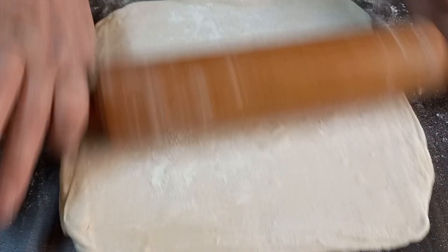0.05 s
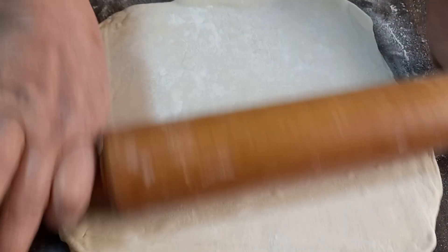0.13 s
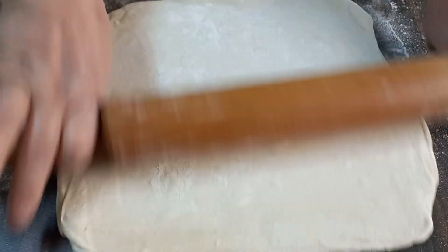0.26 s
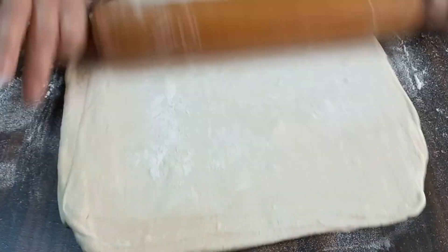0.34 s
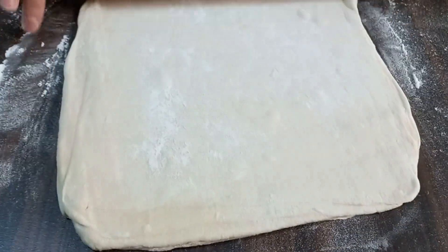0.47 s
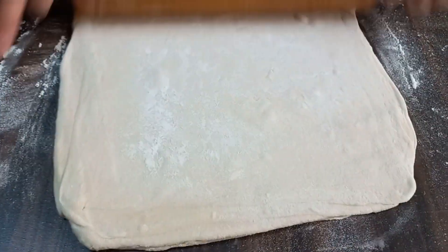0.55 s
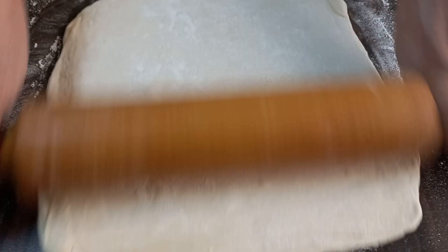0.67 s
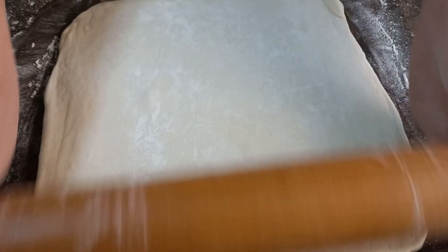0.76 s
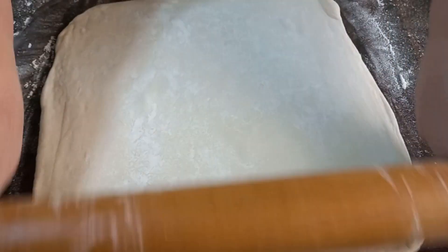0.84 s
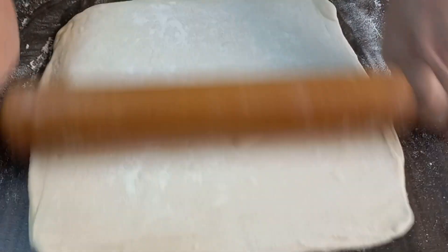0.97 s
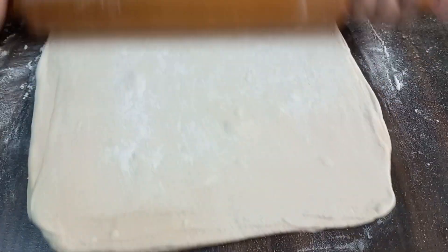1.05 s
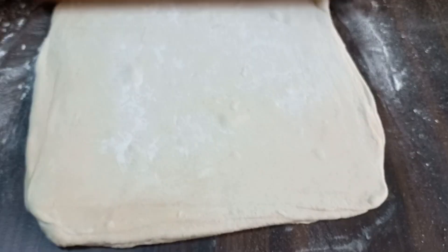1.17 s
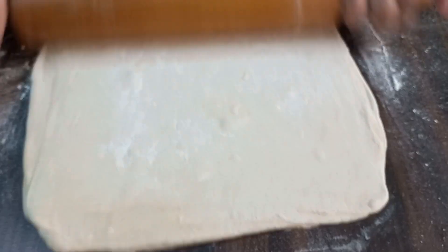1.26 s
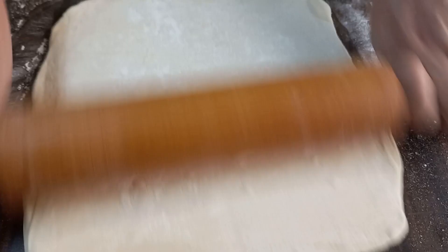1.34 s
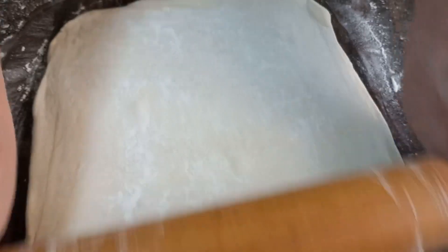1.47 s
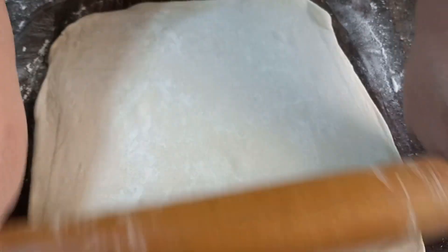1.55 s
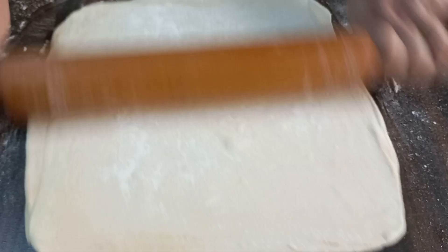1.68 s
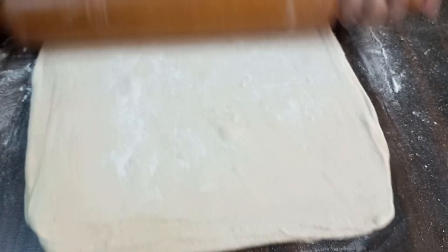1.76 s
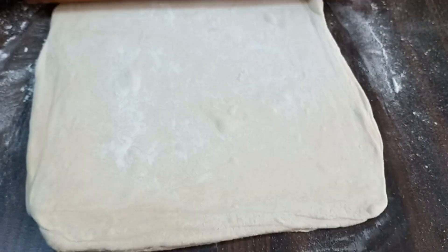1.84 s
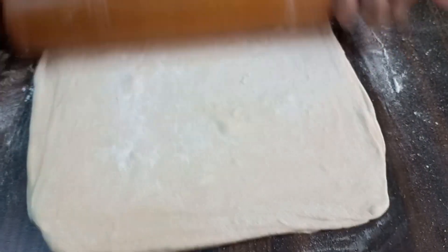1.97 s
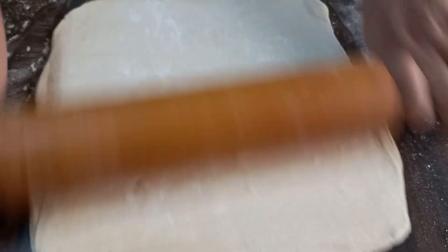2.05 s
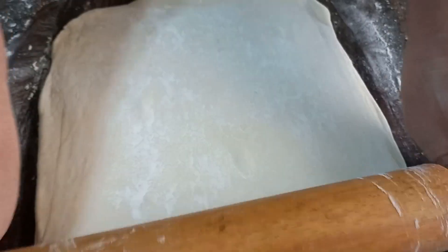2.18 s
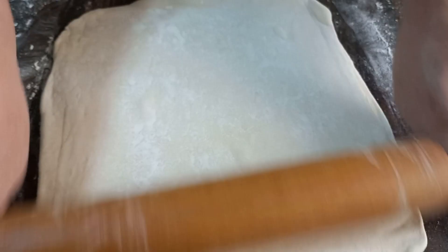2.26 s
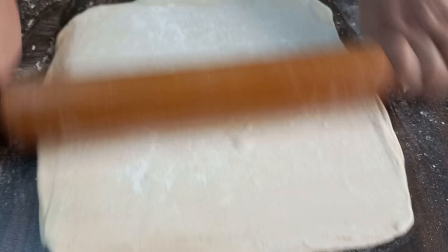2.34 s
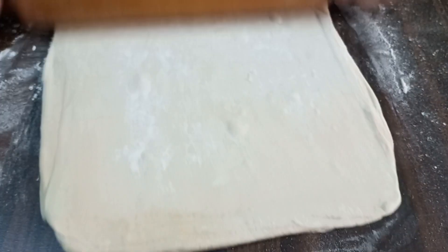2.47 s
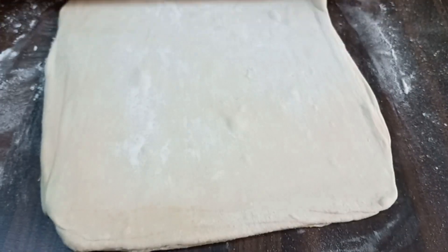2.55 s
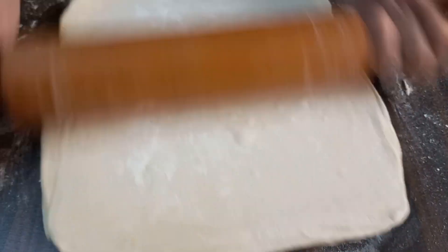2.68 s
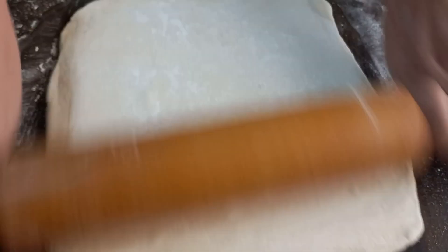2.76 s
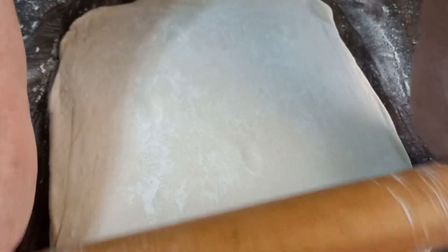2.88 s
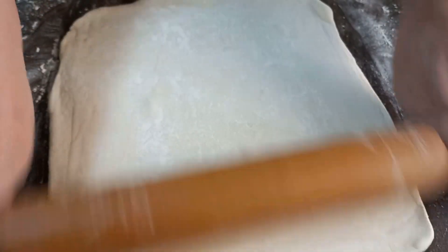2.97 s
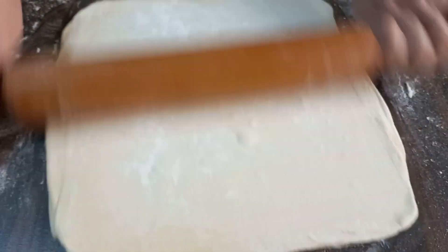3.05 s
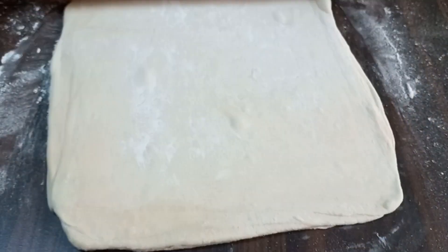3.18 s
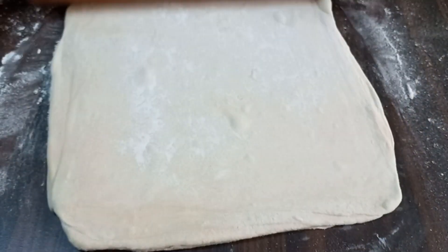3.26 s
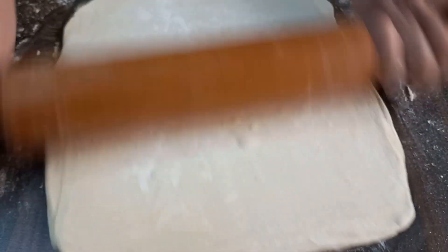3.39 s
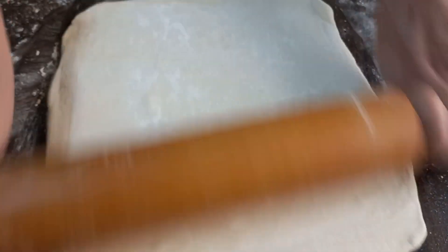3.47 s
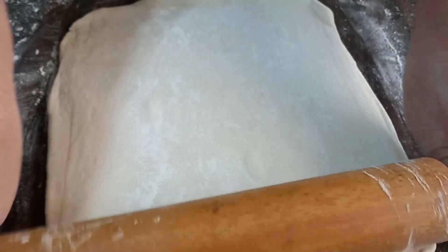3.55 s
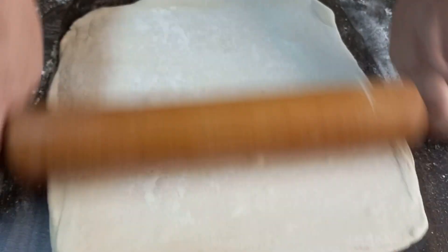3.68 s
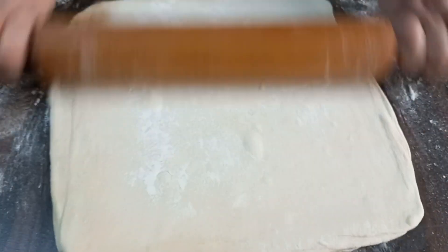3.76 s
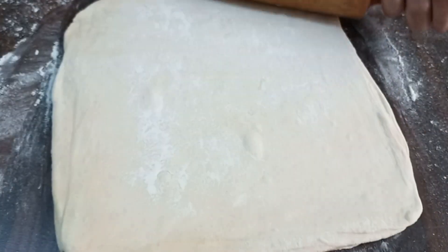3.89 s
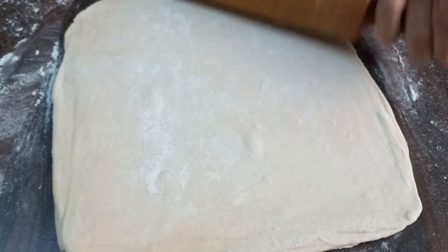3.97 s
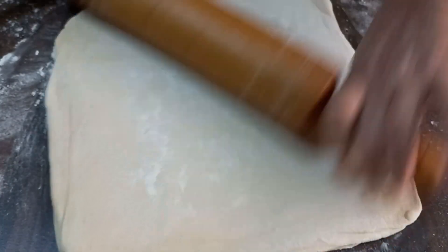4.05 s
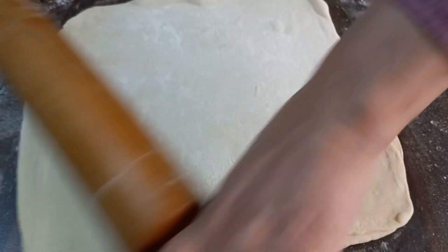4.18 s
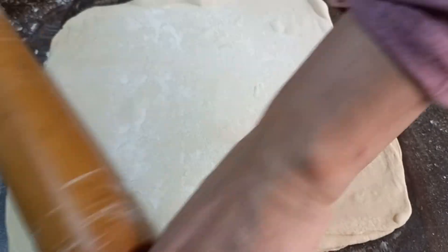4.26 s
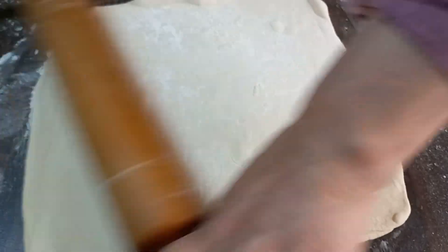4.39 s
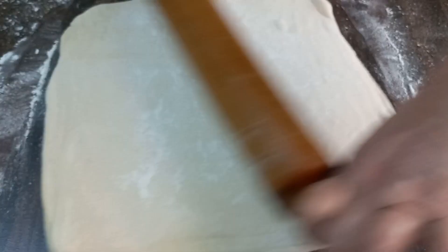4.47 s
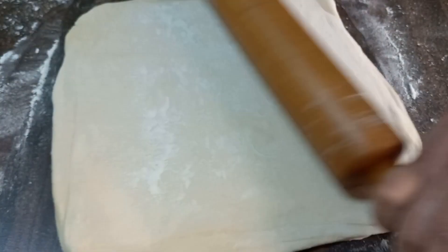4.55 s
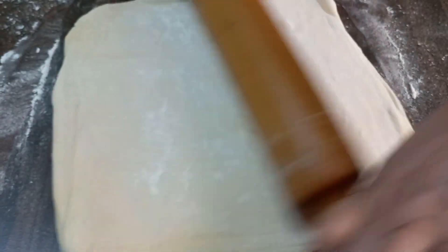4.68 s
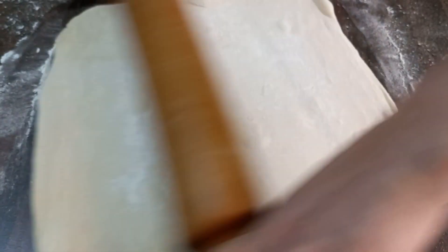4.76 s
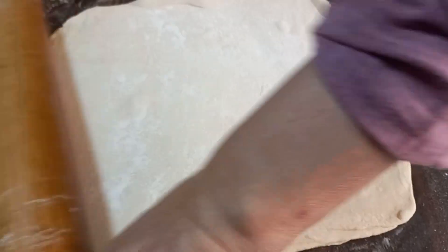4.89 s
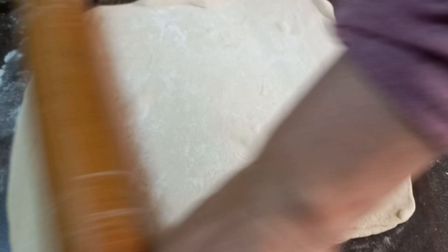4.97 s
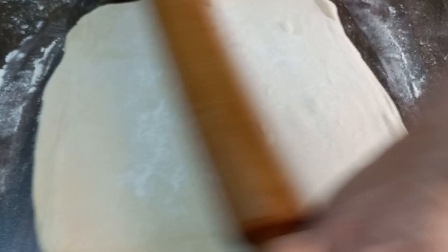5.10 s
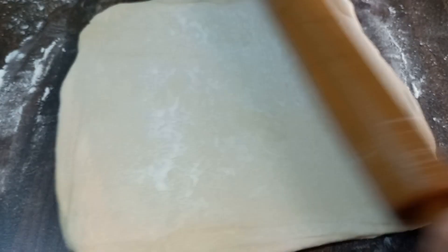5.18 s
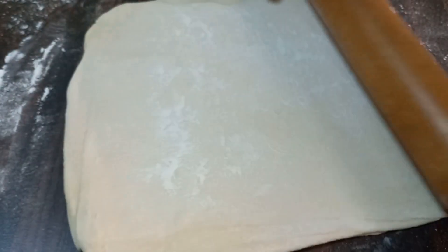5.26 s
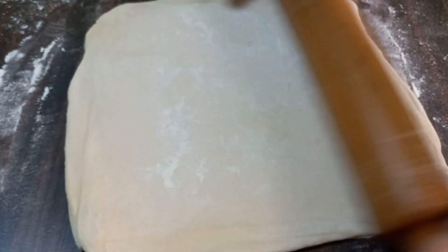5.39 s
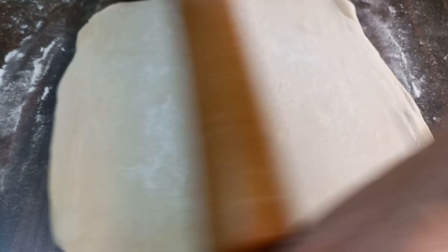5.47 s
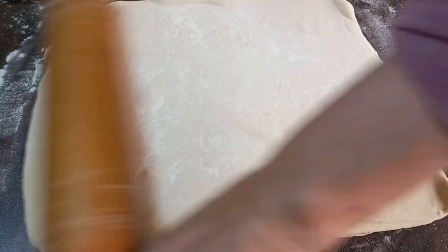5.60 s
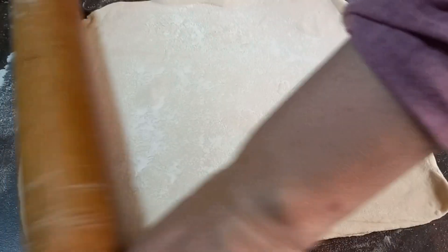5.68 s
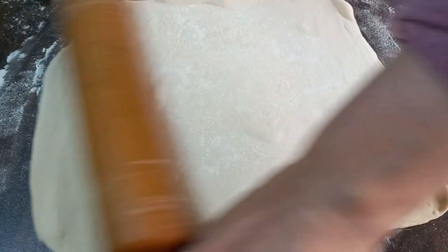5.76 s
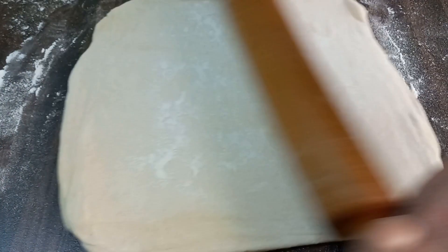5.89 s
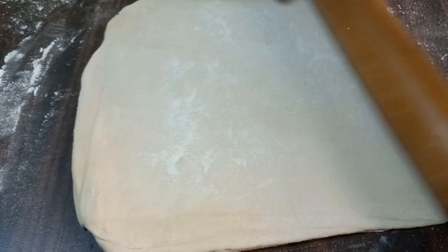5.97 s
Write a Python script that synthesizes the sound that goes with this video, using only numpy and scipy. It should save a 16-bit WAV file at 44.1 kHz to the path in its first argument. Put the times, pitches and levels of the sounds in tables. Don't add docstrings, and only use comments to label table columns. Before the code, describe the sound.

A wooden rolling pin rubs to and fro over floured dough, counter booming softly under the weight, with dull bumps and one hard knock.

```python
import sys
import numpy as np
from scipy import signal
from scipy.fft import rfft, irfft, next_fast_len
from scipy.io import wavfile
from scipy.ndimage import uniform_filter1d

SR = 44100
rng = np.random.default_rng(int(sys.argv[2]) if len(sys.argv) > 2 else 0)


def volts_from_decibels(level):
    exponent = np.asarray(level, float) / 20
    return 10 ** exponent


def generate_wav(signal):
    frames = np.transpose(np.atleast_2d(signal))
    scaled = np.clip(frames, -1, 1) * 32767
    pcm = np.round(scaled).astype(np.int16)
    wavfile.write(sys.argv[1], SR, pcm)


N = 265923
T = np.arange(N) / SR


def evened(x):
    return x / np.sqrt(np.mean(x ** 2) + 1e-20)


def read(points, hz):
    f, value = np.transpose(points)
    return np.interp(np.log(hz + 1), np.log(f + 1), value)


def curves(rows):
    s, *columns = np.transpose(rows)
    return [np.interp(T, s, c) for c in columns]


def add(mix, s, sound):
    part = mix[round(s * SR):][:len(sound)]
    part += sound[:len(part)]


def ring(x, hz, width):
    r = np.exp(-np.pi * width / SR)
    turn = 2 * np.pi * hz / SR
    return signal.lfilter([np.sin(turn)], [1, -2 * r * np.cos(turn), r * r], x)


# pitch_hz, likeness (1 = same, 0 = unrelated)
LIKENESS = [(60, 0.19), (130, 1), (290, 0.64), (640, 0.47), (1410, 0.1), (3100, 0.046), (6820, -0.036),
            (15000, -0.048)]


def noise(colour, patchy_db, flicker_db, size=512):
    frames = 4 * N // size + 5
    hz = np.fft.rfftfreq(size, 1 / SR)
    a, b, c, d, patches = rng.standard_normal((frames, len(hz), 5)).T
    patches = uniform_filter1d(patches, size=3, axis=0)
    patches = evened(uniform_filter1d(patches, size=20, axis=1))
    flicker = evened(uniform_filter1d(rng.standard_normal(frames), size=4))
    same = np.clip(read(LIKENESS, hz), -1, 1)[:, None]
    left = a + 1j * b
    right = same * left + np.sqrt(1 - same ** 2) * (c + 1j * d)
    z = np.array([left, right])
    z *= volts_from_decibels(read(colour, hz)[:, None] + patchy_db * patches + flicker_db * flicker)
    return evened(signal.istft(z, nperseg=size, noverlap=3 * size // 4)[1][:, :N])


# dough_scuff_db, fine_fizz_db, palm_grip_db
STROKES = [(-.26, -51, -2, -1, -13), (0.083, -52.5, -2, 3, -10.5), (0.393, -52.5, -2.5, 2.5, -13),
           (0.738, -51, -3.5, 4.5, -11), (1.058, -54, -1, 3.5, -8.5), (1.426, -51, -3, 4.5, -9),
           (1.769, -54, -1.5, 1, -14), (2.114, -52, -2.5, 4.5, -12), (2.442, -54, -1, 4, -11.5),
           (2.791, -51.5, -2.5, 3.5, -13), (3.140, -52, -2.5, 4, -10), (3.481, -51, -4, 2.5, -12),
           (3.808, -56, -5, 2.5, -5), (4.206, -56.5, -4, 3, -7), (4.519, -57.5, -3, 2.5, -3),
           (4.833, -56.5, -1.5, 2.5, -7), (5.208, -56.5, -4.5, 4, -5), (5.577, -55.5, -0.5, 2, -6.5)]
LAST_TURN_S = 6.025


def stroke_at(lag_s=0):
    turns = np.append(np.transpose(STROKES)[0], [LAST_TURN_S, LAST_TURN_S + .35]) + lag_s
    k = np.searchsorted(turns, T, side="right") - 1
    length = np.diff(turns)[k]
    return np.minimum(k, len(STROKES) - 1), (T - turns[k]) / length, length


def blurred(level_db):
    blur_s = 0.0099
    return uniform_filter1d(level_db, max(round(blur_s * SR), 1))


# full_speed_shift (share of stroke), let_go_shift (share of stroke),
# extra_sag_db, stopped_before (how fully the pin had stopped, 0-1)
PACE = [(0, 0.033, 0, 1), (-0.034, -0.052, -1, 1), (.1, 0.02, 1, 0.82), (0.011, -0.026, 1, 1),
        (-0.047, 0.023, 1, 0.93), (-0.027, -0.066, -0.5, 0.99), (-0.062, 0.053, -0.5, 1),
        (-0.02, 0.0084, -0.5, 1.05), (-0.028, 0.034, -0.5, 1), (-0.057, -0.078, 0, 1.05),
        (0.035, 0.022, -2.5, 0.75), (-0.051, 0.041, 0, 1.06), (-0.071, 0.018, -3.5, 0.57),
        (0.0026, -0.019, 0, 0.68), (0.0037, -.05, 1, 0.77), (-0.13, 0.00088, 3, 0.81),
        (-0.019, -0.04, 0.5, 0.88), (-0.047, -0.02, 0.5, 0.9), (0, 0, 0, 0.8)]


def sliding(level_db, shape):
    turn_db, swell, lag_s, ways = shape
    k, u, _ = stroke_at(lag_s)
    full, let_go, sag_db = (np.array(ways)[k % 2] + np.array(PACE)[k, :3]).T
    full = np.clip(full, .1, .9)
    let_go = np.clip(let_go, full + .01, .97)
    stopped = np.transpose(PACE)[3]
    rise = turn_db * stopped[k] * np.clip(1 - u / full, 0, 1) ** swell
    sag = sag_db * np.clip((u - full) / (let_go - full), 0, 1)
    drop = (turn_db * stopped[k + 1] - sag_db) * np.clip((u - let_go) / (1 - let_go), 0, 1)
    return volts_from_decibels(blurred(level_db[k] + rise + sag + drop))


# pitch_hz, level_db (per Hz)
HISS = [(3300, -32), (3900, -10.5), (4440, 1), (5500, -1), (6790, -3), (7520, -2.5), (8290, -7.5),
        (10500, -4), (13600, -72)]
SCUFF = [(410, -12), (700, -9.5), (960, -8), (1250, -2), (1500, -0.5), (1910, -2), (2250, -3.5),
         (2700, -11.5), (3200, -10), (3800, -7.5), (4400, -22.5)]
FIZZ = [(8500, -15), (10300, -6), (11500, 1), (12500, 3.5), (14000, 2.5), (15700, 0.5), (17000, -20)]
GRIP = [(2100, -43), (2450, -3), (2620, -5.5), (2800, -11.5), (3100, -20)]
# full_at (share of stroke), let_go_at (share of stroke), sag_db
HISS_SHAPE = (-22.5, 2.21, 0.00068, [(0.47, .8, -2), (0.5, 0.82, -3)])
SCUFF_SHAPE = (-23, 1.93, 0.022, [(.55, .7, -2.7), (.55, .7, -2.7)])
FIZZ_SHAPE = (-25, 2.1, 0.002, [(.38, .78, -2.5), (.45, .84, -3.5)])
GRIP_SHAPE = (-24, 1.9, 0.0092, [(.55, .84, -0.43), (.55, .84, -1.8)])
# time_s, extra_fizz_db
SURGES = [(.54, 0.77), (1.2, 2.4), (1.9, 6.2), (2.57, 3), (3.28, 4.5), (5.3, 1)]


def rolling():
    _, hiss_db, scuff_db, fizz_db, grip_db = np.transpose(STROKES)
    surge_width_s = 0.018
    surge_db = sum(db * np.exp(-((T - s) / surge_width_s) ** 2) for s, db in SURGES)
    hiss = sliding(hiss_db, HISS_SHAPE) * noise(HISS, patchy_db=2.83, flicker_db=0.24)
    scuff = sliding(hiss_db + scuff_db, SCUFF_SHAPE) * noise(SCUFF, patchy_db=-1.0, flicker_db=0.2)
    fizz = sliding(hiss_db + fizz_db, FIZZ_SHAPE) * noise(FIZZ, patchy_db=3.0, flicker_db=1.0)
    grip = sliding(hiss_db + grip_db, GRIP_SHAPE) * noise(GRIP, patchy_db=-0.5, flicker_db=1.1)
    return hiss + scuff + volts_from_decibels(surge_db) * fizz + grip


# heaviest_at (share of stroke), held_for (share of stroke),
# slab_boom_db, wood_rumble_db, boom_fall (dB per s)
WEIGHT = [(0.64, .1, -30, -43.5, 194), (0.59, 0.33, -42.5, -53.5, 190), (0.65, 0.13, -39.5, -48, 146),
          (0.6, 0.089, -35, -49.5, 115), (.6, 0.13, -39, -46, 64), (0.63, 0.29, -33.5, -55.5, 216),
          (0.62, 0.41, -42, -55, 190), (0.66, 0.19, -36.5, -52, 90), (0.61, 0.2, -40.5, -51.5, 300),
          (0.62, 0.11, -37.5, -50, 74), (0.59, 0.18, -43.5, -52, 170), (0.6, 0.24, -48, -58, 187),
          (0.47, .3, -41.5, -58.5, 447), (0.75, 0.68, -52, -69, 100), (0.71, 0.17, -45, -61, 150),
          (0.64, 0.32, -50, -57.5, 196), (.6, 0.33, -49, -64, 248), (.5, .35, -47, -59, 190)]


def leaning():
    boom_rise, wood_rise, wood_fall = 137, 86.5, 87
    k, u, length = stroke_at()
    at, held, boom_db, wood_db, boom_fall = np.array(WEIGHT)[k].T
    early_s = np.maximum(at - u - held / 2, 0) * length
    late_s = np.maximum(u - at - held / 2, 0) * length
    boom_db = boom_db - boom_rise * early_s - boom_fall * late_s
    wood_db = wood_db - wood_rise * early_s - wood_fall * late_s
    return blurred(boom_db), blurred(wood_db)


# pitch_hz, level_db (per Hz)
WOOD = [(120, -2.5), (200, 6), (250, -2.5), (300, 0.5), (345, -14), (410, -22), (540, -10.5), (670, -18.5),
        (800, -15), (1000, -19), (1300, -55.5)]
# pitch_hz, width_hz, level_db
SLAB_MODES = [(94.7, 5.7, 0.5), (121.74, 4.85, 5.5), (188, 11.6, -12), (291.5, 3.6, -28)]


def counter():
    jolts_per_s = 400.0
    steadied = 0.73
    boom_db, wood_db = leaning()
    wood = volts_from_decibels(wood_db) * noise(WOOD, patchy_db=1.5, flicker_db=1.2, size=1024)
    jolts = rng.standard_normal((3, N)) * (rng.random(N) < jolts_per_s / SR)
    common, left, right = (
        sum(volts_from_decibels(db) * evened(ring(j, hz, width)) for hz, width, db in SLAB_MODES) for j in jolts)
    power = uniform_filter1d(uniform_filter1d(common ** 2, size=2500), size=2500)
    swells = abs(power) ** (steadied / 2)
    slab = common + 0.056 * np.array([left, right])
    return wood + volts_from_decibels(boom_db) * evened(slab / swells)


# time_s, firing_rate_hz, level_db, low_boom_db
ENGINE = [(0, 47.92, -48, -82), (.62, 47, -50.5, -81), (.85, 46, -49.5, -59), (.95, 43, -54, -84),
          (1.35, 40.87, -44, -78), (1.6, 36, -60, -70), (1.9, 30.5, -51.5, -80), (2.1, 30.49, -57.5, -54),
          (3.0, 30.8, -56.5, -50), (3.4, 30.4, -49.5, -50), (3.55, 30.43, -73, -70), (3.7, 31.45, -54, -55),
          (4.4, 33.2, -57.5, -59), (4.54, 33.23, -61, -90), (4.63, 32.42, -46, -52),
          (5.15, 32.48, -51.5, -57), (5.6, 31.4, -52.5, -52.5), (6.03, 31.2, -54.5, -55)]
# pitch_hz, level_db
WALLS = [(40, -41), (95, -27), (128, -7), (140, 1), (165, -0.5), (195, -5.5), (230, -11.5), (255, -17),
         (290, -20), (400, -35.5)]


def engine():
    hz, level_db, boom_db = curves(ENGINE)
    turns = np.cumsum(hz) / SR
    out = np.zeros((2, N))
    for order in range(1, 11):
        waver = evened(np.interp(T, np.arange(62) / 10, rng.standard_normal(62)))
        side_shift = [[0], [0.35 * rng.standard_normal()]]
        phase = 2 * np.pi * (order * turns + rng.random()) + 0.29 * waver + side_shift
        db = boom_db if order == 2 else level_db + read(WALLS, order * hz)
        out += np.sqrt(2) * volts_from_decibels(db + 1.5 * waver[::-1]) * np.sin(phase)
    return out


# pitch_hz, level_db (per Hz)
AIR = [(25, -8), (70, 1), (140, 13.5), (216, 0.5), (423, -12.5), (949, -35), (1860, -17), (2570, -33.5),
       (3200, -69), (4650, -36.5), (8400, -30.5), (12600, -43.5), (15700, -65)]


def still_air():
    return volts_from_decibels(-57) * noise(AIR, patchy_db=2.2, flicker_db=.3, size=2048)


# pitch_hz, level_db, t60_s
STRUCK_MODES = [(90, -35, .3), (122.2, -8.5, 0.9), (150.6, -7, 0.49), (203, -16, 0.13), (252, -3, 0.039),
                (250, -2, 0.06), (321, 4.5, 0.047), (351.4, -10, 0.21), (388, -12, 0.28), (466.5, -8, 0.2),
                (520, 5, 0.073), (561, 4.5, 0.093), (626, 0.5, 0.095), (659, -8, 0.28), (720, -27, 0.09),
                (787, -35, 0.094), (850, -22, 0.09), (928, -16, 0.14), (1280, -30, .1)]


def struck(blows, damping):
    force = np.zeros(N)
    for s, size, contact_s in blows:
        push = np.sin(np.pi * np.arange(0, contact_s, 1 / SR) / contact_s)
        add(force, s, size * push / push.sum())
    return sum(volts_from_decibels(db) * ring(force, hz, damping * 2.2 / t60) for hz, db, t60 in STRUCK_MODES)


# time_s, peak_db, contact_s
BUMPS = [(0.646, -23, 0.002), (0.849, -26.5, 0.0026), (0.894, -51, 0.0013), (1.192, -38, 0.0019),
         (1.273, -32.5, 0.001), (1.535, -44, 0.0029), (1.596, -60, 0.002), (1.978, -21, 0.0026),
         (2.65, -25, 0.0025), (3.358, -29, 0.0024), (4.67, -51, 0.0018)]
# time_s, level_db, pitch_hz, t60_s
TICKS = [
    (.514, -39, 1180, 0.025),
    (3.105, -43, 1900, 0.016),
    (3.770, -43.5, 1050, .03),
    (3.7735, -42, 1410, 0.046),
    (3.796, -42, 5236, .02),
]


def bumps():
    blows = [(s, volts_from_decibels(db), max(contact_s, .0004)) for s, db, contact_s in BUMPS]
    out = volts_from_decibels(-18.5) * struck(blows, damping=2.1)
    t = T[:SR // 4]
    for s, db, hz, t60 in TICKS:
        swell = 1 - np.exp(-t / 0.0019)
        add(out, s, volts_from_decibels(db - 60 * t / max(t60, .005)) * swell * np.sin(2 * np.pi * hz * t))
    return out


KNOCK_S = 3.7952


def knock():
    contact_s = 0.0011
    steps = [(-.0022, 0.21), (0, 1), (.0018, -0.5), (.0036, 0.4), (.0147, .3), (.0257, 0.39)]  # delay_s, share
    body = struck([(KNOCK_S + delay_s, share, contact_s) for delay_s, share in steps], damping=1)
    return volts_from_decibels(-10) * body / abs(body).max()


# pitch_hz, level_db (per Hz)
RATTLE = [(700, -28), (1000, 3), (1800, -4), (2600, -6.5), (3300, -12.5), (6000, -16), (9000, -43)]


def rattle():
    since = T - KNOCK_S
    fade = volts_from_decibels(-49.5 - 60 * abs(since) / 0.58)
    return (since > 0) * fade * noise(RATTLE, patchy_db=4.5, flicker_db=1.5, size=256)


# pitch_hz, t60_s
KITCHEN = [(100, 0.23), (300, 0.45), (700, 0.32), (2000, 0.36), (8000, 0.32)]


def kitchen(x):
    taps = np.zeros((2, SR))
    at = np.arange(160, SR - 20, 20) + rng.integers(0, 20, (2, (SR - 161) // 20))
    np.put_along_axis(taps, at, rng.choice([-1., 1.], at.shape), 1)
    hz, t, z = signal.stft(taps, SR, nperseg=1024)
    fade = volts_from_decibels(-60 * t / read(KITCHEN, hz)[:, None])
    tail = signal.istft(z * fade, SR, nperseg=1024)[1]
    tail = tail + .25 * tail[::-1]
    return signal.fftconvolve(x[None], tail / np.linalg.norm(tail[0]), axes=1)[:, :N]


def scene():
    steady = rolling() + counter() + engine() + still_air()
    hits = bumps() + knock()
    direct = np.array([np.roll(hits, 7), hits])
    return steady + direct + volts_from_decibels(-3.0) * kitchen(hits) + rattle()


def roll_off(x):
    return signal.sosfilt(signal.butter(12, 15800, fs=SR, output="sos"), x)


# pitch_hz, left_minus_right_db
PORTS = [(60, -3), (92, 1.5), (140, -1), (210, -0.5), (330, -1), (500, 1.5), (770, -4.5), (1170, -4),
         (1790, -10), (2740, 7), (4190, -2.5), (6410, 0.0), (9810, 1.5), (15000, -0.5)]


def record(dry):
    size = next_fast_len(N + SR // 2)
    hz = np.fft.rfftfreq(size, 1 / SR)
    lean_db = read(PORTS, hz) / 2
    bass_cut = 1 / np.sqrt(1 + (66.6 / (hz + 1)) ** 4.8)
    response = bass_cut * volts_from_decibels(np.array([lean_db, -lean_db]))
    padded = np.pad(dry, ((0, 0), (0, size - N)), "linear_ramp")
    ports = irfft(rfft(padded) * response, size)[:, :N]
    return roll_off(ports)


dry = scene()
out = record(dry)
generate_wav(out)
```